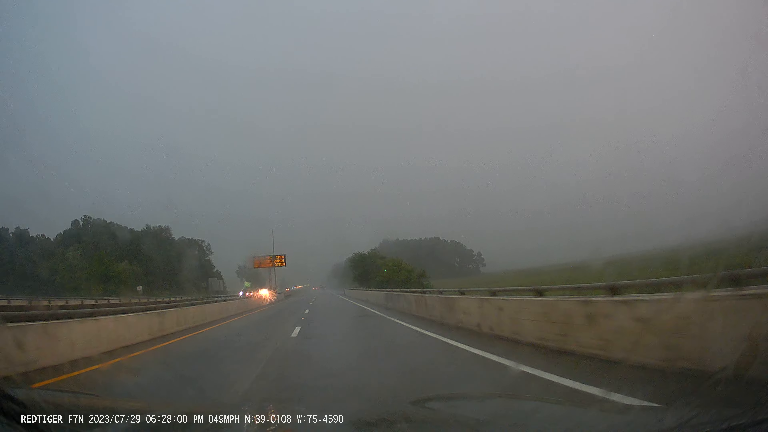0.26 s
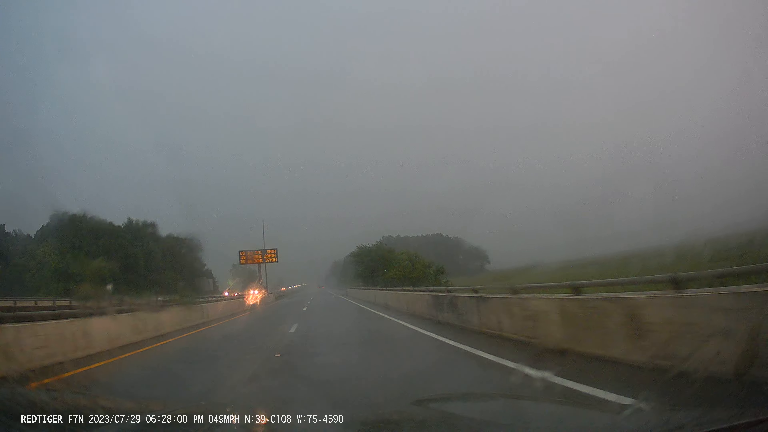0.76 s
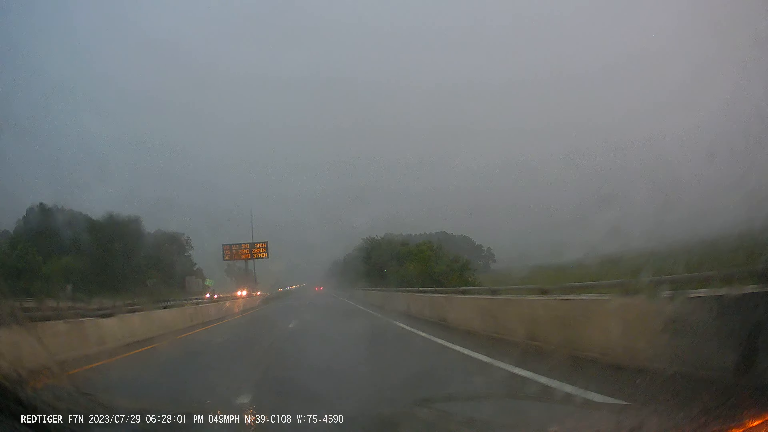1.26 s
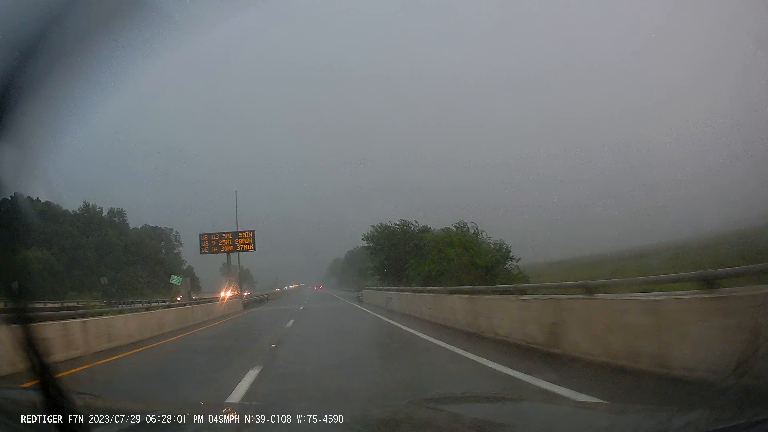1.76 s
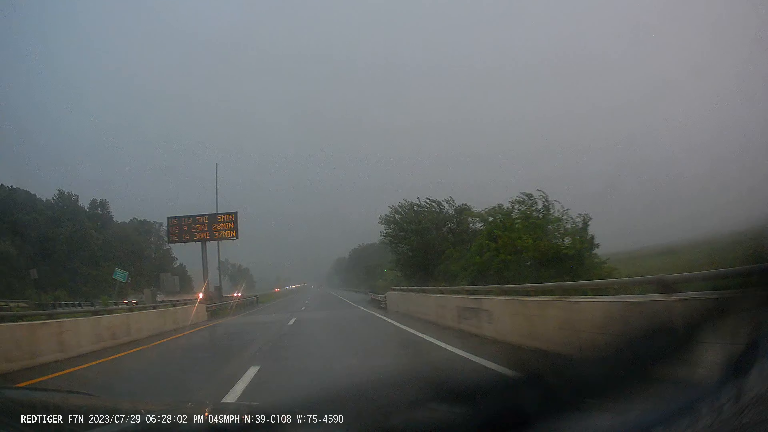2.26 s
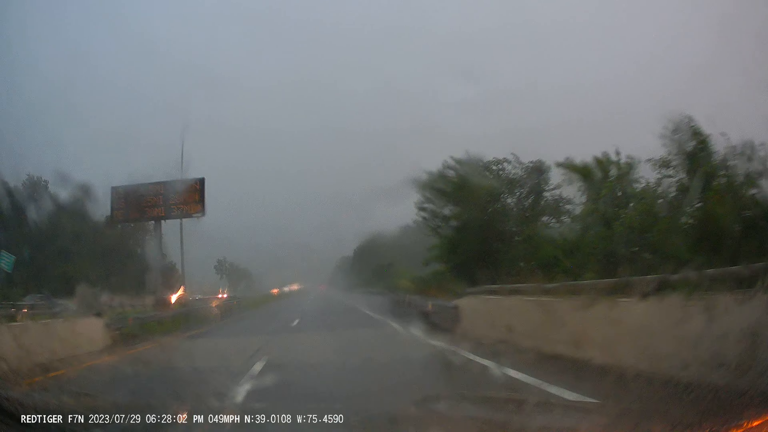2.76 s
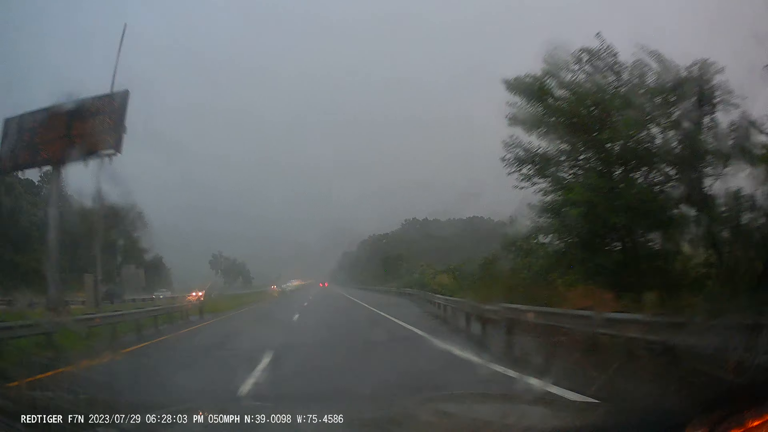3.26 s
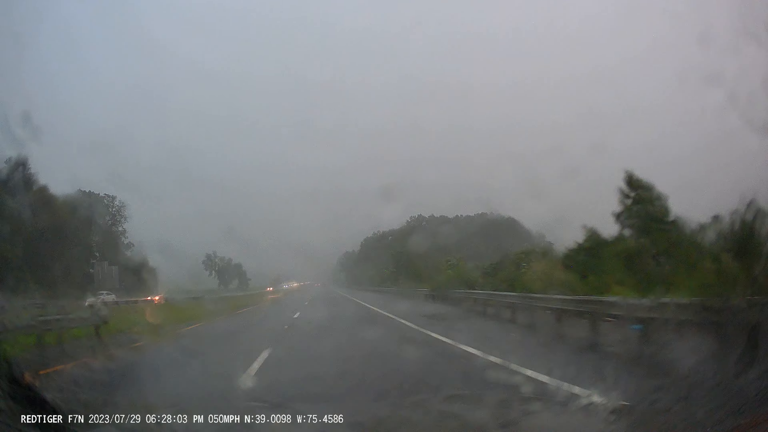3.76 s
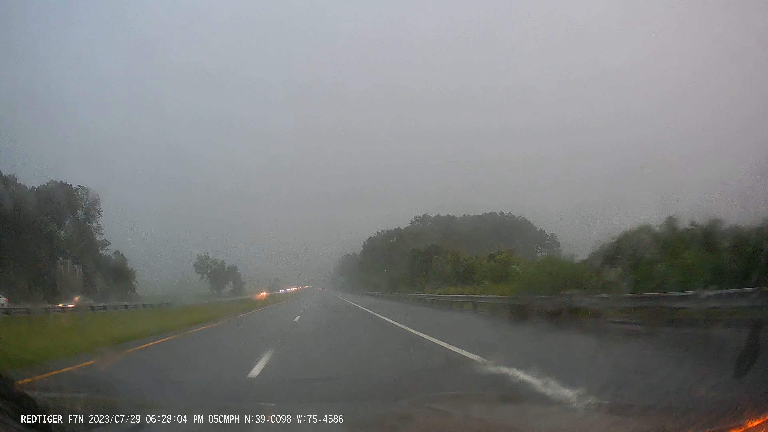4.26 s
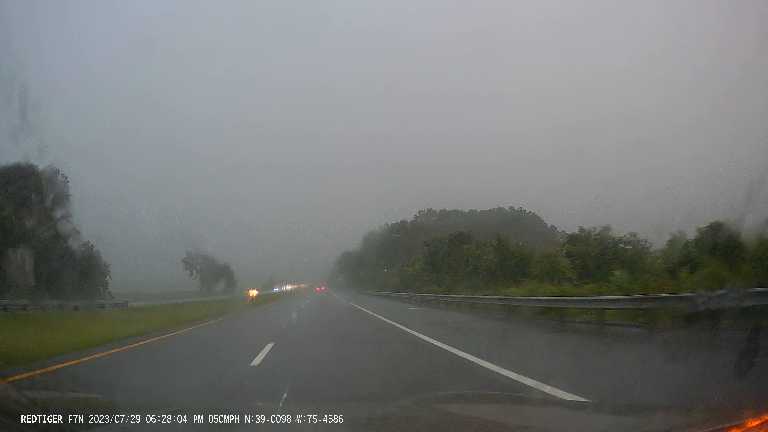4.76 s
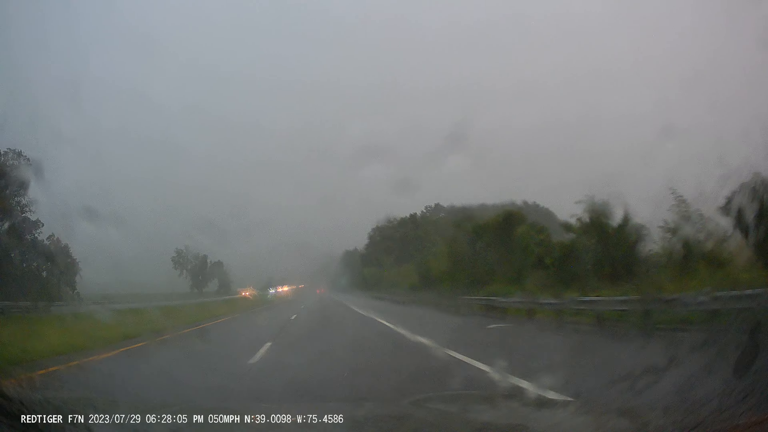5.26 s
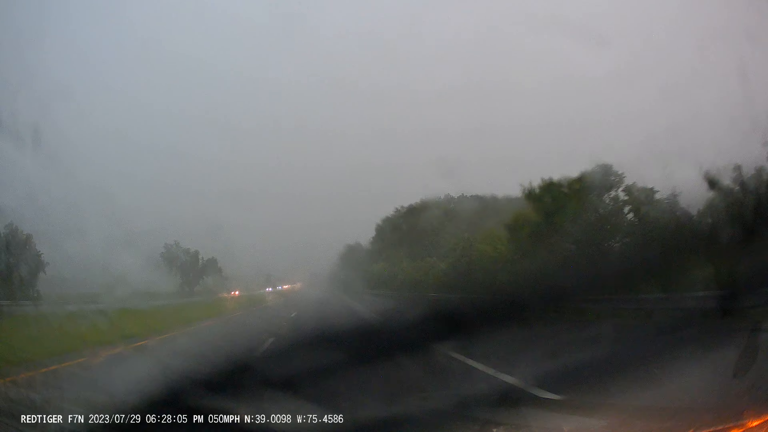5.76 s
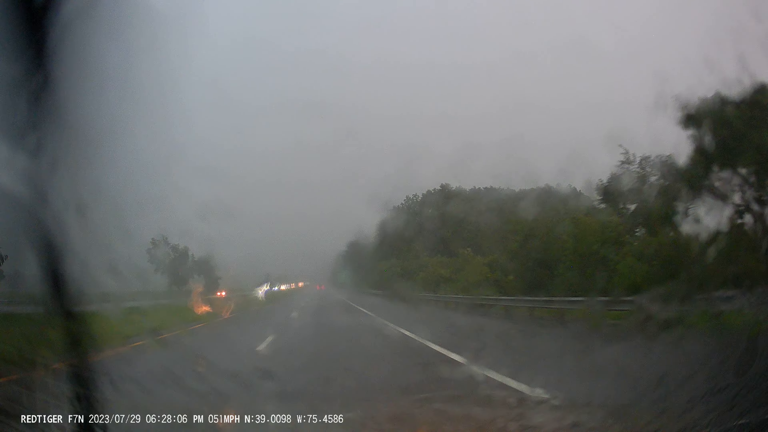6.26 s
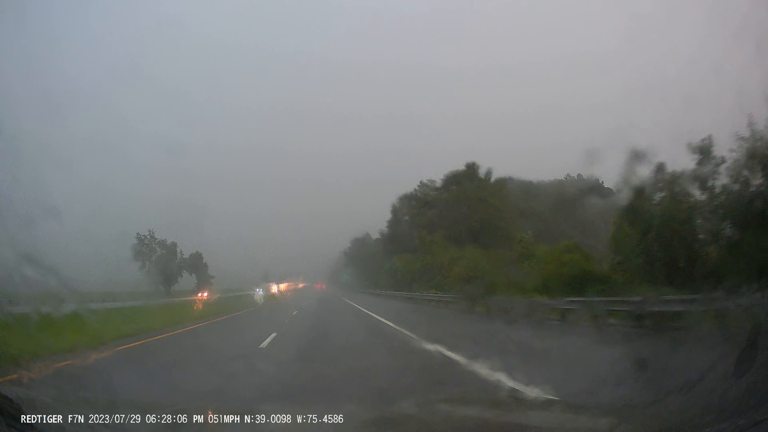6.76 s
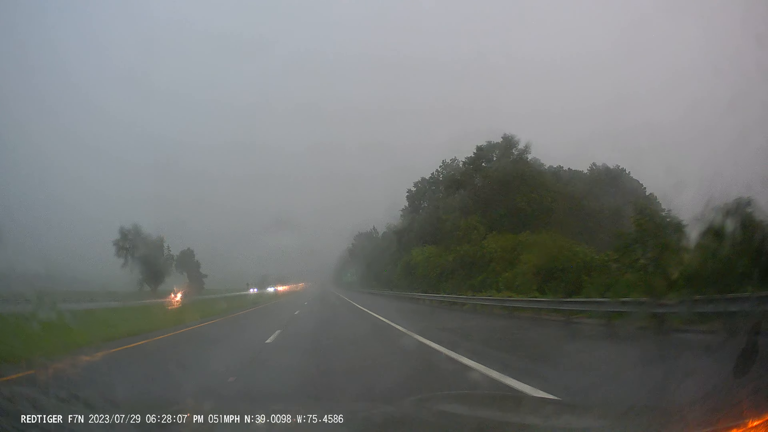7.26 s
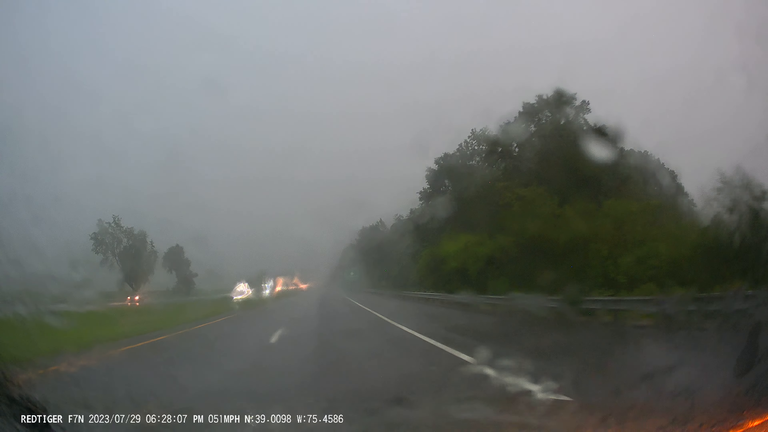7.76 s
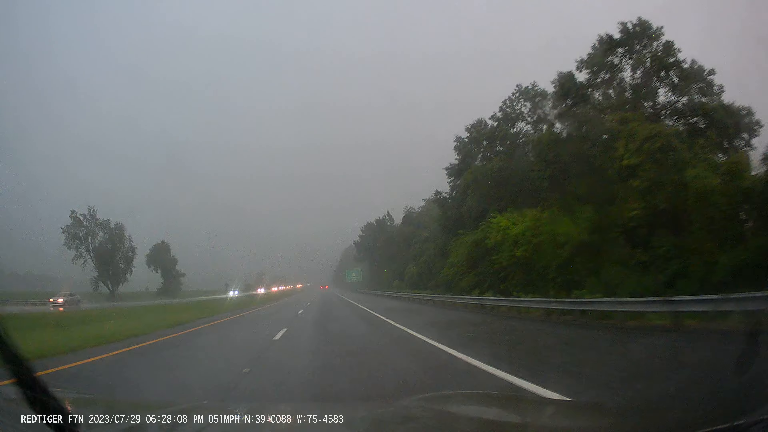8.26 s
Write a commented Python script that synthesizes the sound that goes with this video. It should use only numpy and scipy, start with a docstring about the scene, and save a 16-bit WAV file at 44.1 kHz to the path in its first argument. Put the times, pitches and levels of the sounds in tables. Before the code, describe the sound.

Inside a car on a wet highway, a small microphone at the windscreen picks up constant rain spray and rattling drops over deep cabin boom, tyre roar and wheel-well wash. Bumps swell underneath. Midway a rough stretch thuds in a cluster while the rain thins, then rain returns harder and large drops ping the glass almost to the end.

```python
"""Inside a car on a highway in heavy rain, heard by a small microphone at the windscreen.
From the start, noise rung through the glass makes spray and rattling drops, over booming cabin modes, tyre
roar and wheel-well wash; bumps swell the road and jolts ring in the body. Two tread-hum lines grow and drift
upward. Rough road brings a crowd of jolts near 3.6 s; near 4.3 s come a low noise whoosh and brief rain dips.
Large drops then ping until shortly before the end. Soft overload flattens the tallest peaks throughout."""
import sys
import numpy as np
from scipy import signal
from scipy.fft import rfft, irfft, next_fast_len
from scipy.io import wavfile
from scipy.ndimage import uniform_filter1d

SR = 44100
rng = np.random.default_rng(int(sys.argv[2]) if len(sys.argv) > 2 else 0)


def unload_wav(signal):
    """Save mono or channel-first audio to the path in sys.argv[1] as 16-bit WAV at rate SR, clipped to [-1, 1]."""
    wavfile.write(
        sys.argv[1],
        SR,
        np.round(np.clip(np.atleast_2d(signal).T, -1, 1) * 32767).astype(np.int16),
    )


N = 375286

# Rain on the glass, with its rises and dips: (time [s], level [dB])
RAIN_LEVEL = [(0, -24.5), (.3, -29.5), (.5, -25), (.57, -29.5), (.75, -24.5), (1.07, -28.5), (1.3, -23),
              (1.45, -30), (1.55, -25.5), (3.12, -24), (3.47, -22), (3.54, -32.5), (3.63, -34),
              (3.75, -31.5), (3.99, -31), (4.03, -25.5), (4.28, -21.5), (4.4, -24), (4.55, -20.5),
              (5.25, -22.5), (5.7, -20), (6.95, -18.5), (7.3, -19), (7.9, -19), (8.29, -22.5), (8.4, -19),
              (8.51, -21)]
# Further brief dips of the rain, on top of that level: (start [s], end [s], level change [dB])
RAIN_DIPS = [(4.306, 4.376, -5), (4.412, 4.464, -11), (4.478, 4.531, -10)]
# Largest single drops: (time [s], level before decay [dB], ring [Hz])
LARGE_DROPS = [(4.4666, -16, 1420), (4.9828, -0.5, 2600), (5.3078, -6, 2640), (5.5264, -4, 2640),
               (5.6276, -4, 1540), (5.71, -1, 1460), (5.959, 0, 2480), (6.0307, 1, 1500), (6.134, -2, 2740),
               (6.3135, -10, 1660), (6.393, -2, 1600), (6.456, -2, 1580), (6.759, 0.5, 2550),
               (6.909, -8, 1550), (6.94, 6, 2600), (6.9704, 3, 1420), (7.009, 3, 1700), (7.071, -1, 1730),
               (8.0531, -4, 1450), (8.2955, -11, 1840)]
# Tone of windscreen and dashboard: (frequency [Hz], gain [dB])
GLASS_TONE = [(200, -26), (500, -11.5), (950, -11.5), (2000, -13.5), (3100, -16), (4200, -17.5),
              (5600, -23.5), (7500, -29), (8300, -39), (9200, -65.5)]
# Broad glass peaks on top of that tone: (centre [Hz], width [Hz], boost [dB])
GLASS_PEAKS = [(1500, 840, 7.5), (2600, 446, 9.5), (4990, 640, 5.5)]
# Tone of water thrown into the wheel wells: (frequency [Hz], gain [dB])
WHEEL_WELL_TONE = [(150, -16.5), (260, -1.5), (400, 0.5), (600, -2.5), (850, -5.5), (1200, -17),
                   (2000, -50)]
# Road between bumps: (time [s], deep cabin boom [dB], upper cabin boom [dB], tyre roar [dB])
ROAD_LEVELS = [(0.0, -24, -21.5, -20), (1.5, -21, -23.5, -23.5), (3.1, -31, -24, -22.5),
               (3.66, -27, -21.5, -28), (4.0, -22.5, -24.5, -23), (4.5, -31, -25, -23.5),
               (7.0, -23.5, -25.5, -22), (8.51, -28.5, -28.5, -23.5)]
# Bumps: (centre [s], length [s], deep boom rise [dB], upper boom rise [dB], tyre roar rise [dB])
ROAD_BUMPS = [(0.06, 0.16, 1, 8, 2.5), (0.31, 0.082, -5, 7, 6.5), (0.453, 0.13, -5, 8, 1.5),
              (0.837, 0.094, -1, 6.5, 2), (1.214, .1, 1, 9, 9.5), (1.334, 0.15, 6, 13.5, 2.5),
              (1.718, 0.1, 2, 9, -7), (2.1, .2, -1, 4, 2.5), (2.352, .1, 5, 4, 2.5),
              (2.6, 0.13, 10, 8, -1.5), (2.92, 0.15, 8, 4.5, -2), (3.29, 0.28, 3, 7.5, 5.5),
              (3.445, 0.16, 6, 0, 6.5), (3.552, 0.47, 20, 6.5, 7), (3.883, 0.27, 9, 3, 5),
              (4.353, 0.17, 3, 5, 4.5), (4.796, 0.19, 11, 1.5, 4), (5.475, 0.11, 10, 11.5, -5),
              (5.704, 0.15, 11, -3, 0), (6.554, 0.1, 0, 11, 2), (7.05, 0.13, 5, -6, -0.5),
              (7.296, .18, 7, 5, 2.5), (7.722, .14, 2, 8.5, 2)]
# Small unevenness: rms spread of deep boom, upper boom and roar [dB]; smoothing time [s]
LUMPS_DB, LUMP_S = (1.5, 2.5, 2), 0.065
# Deep modes of cabin air and body: (centre [Hz], first-pass width [Hz], level [dB])
DEEP_BOOM_MODES = [(27, 14, -3.5), (37.05, 5, -0.5)]
# Upper cabin modes: (centre [Hz], first-pass width [Hz], level [dB])
UPPER_BOOM_MODES = [(53.2, 8.1, -1), (67.5, 21.7, -6.5)]
# Tone of the tyre roar: (frequency [Hz], gain [dB])
TYRE_TONE = [(60, -9), (80, -3), (93, 3), (110, -1.5), (200, -1.5), (260, -8.5), (320, -13.5), (500, -26.5),
             (1000, -60)]
# Jolts through the suspension: (time [s], level before decay [dB], ring [Hz])
SUSPENSION_JOLTS = [(0.281, -9.5, 187), (1.2, -12, 154), (3.123, -7.5, 231), (3.549, -7, 180),
                    (3.631, -14, 177), (3.686, -12, 200), (3.72, -10.5, 179), (3.88, -6.5, 150.6),
                    (4.334, -10, 221), (4.348, -13.5, 255), (4.383, -10, 253)]
# Tread hum: (time [s], lower line [Hz], lower level [dB], upper level [dB])
TREAD_HUM = [(0, 241.5, -39.5, -59), (2, 242.6, -31, -46.5), (3.4, 251.3, -34, -45), (3.65, 252, -50, -50),
             (4.1, 251.3, -33, -43), (6, 251, -31.5, -30), (8.51, 255.8, -30.5, -34.5)]
# Resonance widths of the hum: (lower line [Hz], upper line [Hz])
TREAD_WIDTHS = (8.0, 6.0)
# Low whoosh under the floor: (start [s], end [s], level [dB], centre [Hz], width of each pass [Hz])
FLOOR_WHOOSH = (4.31, 4.435, -23, 333, 340)
EDGE_HZ = 8750  # upper band limit


def gain_of(db):
    """Decibels to amplitude."""
    return 10 ** (np.asarray(db) / 20)


def evened(x):
    """Scales to rms 1."""
    return x / np.sqrt(np.mean(x ** 2) + 1e-20)


def curve(rows):
    """Draws every column of a table over time, one value a sample."""
    s, *columns = np.transpose(rows)
    return [np.interp(np.arange(N) / SR, s, column) for column in columns]


def read(points, hz):
    """Reads a tone table on a log-frequency axis."""
    f, value = np.transpose(points)
    return np.interp(np.log(hz + 1), np.log(f + 1), value)


def add(mix, s, sound):
    """Mixes a sound in at time s."""
    part = mix[round(s * SR):][:len(sound)]
    part += sound[:len(part)]


def shaped(points):
    """Steady noise with the given tone."""
    spectrum = rfft(rng.standard_normal(N))
    tone_db = read(points, np.fft.rfftfreq(N, 1 / SR))
    return evened(irfft(spectrum * gain_of(tone_db), N))


def resonate(x, hz, width):
    """Shifts hz down to zero, smooths, and shifts back: a resonance of gain 1."""
    turn = np.exp(2j * np.pi * np.cumsum(hz * np.ones(len(x))) / SR)
    r = np.exp(-np.pi * width / SR)
    smooth = signal.lfilter([1 - r], [1, -r], x / turn)
    return 2 * (turn * smooth).real


def wander(seconds):
    """Smoothed chance of rms 1 that changes over about the given time."""
    size = max(int(seconds * SR), 1)
    once = uniform_filter1d(rng.standard_normal(N), size=size)
    return evened(uniform_filter1d(once, size=size))


def ring(db, hz, t60, rise_s):
    """One damped vibration with a short soft start; t60 is its 60 dB decay time."""
    t = np.arange(SR // 8) / SR
    envelope = gain_of(db - 60 * t / t60) * np.minimum(t / rise_s, 1)
    return envelope * np.sin(2 * np.pi * hz * t)


def spray(patchy_db=1.0, treble_db=1.15):
    """Countless fine drops: white noise with drifting patches; the finest mist comes in puffs."""
    a, b, patches = rng.standard_normal((N // 128 + 5, 257, 3)).T
    patches = uniform_filter1d(patches, size=10, axis=0)  # across frequency
    patches = evened(uniform_filter1d(patches, size=14, axis=1))  # across time
    puffs = evened(uniform_filter1d(rng.standard_normal(a.shape[1]), size=4))
    # the puffs fade in from 2500 to 6500 Hz
    high = np.clip((np.fft.rfftfreq(512, 1 / SR) - 2500) / 4000, 0, 1)[:, None]
    z = (a + 1j * b) * gain_of(patchy_db * patches + treble_db * high * puffs)
    return evened(signal.istft(z, nperseg=512, noverlap=384)[1][:N])


def taps(per_s, spread_db, cycles, low_hz=1500.0, high_hz=8450.0, count=16):
    """Separate drops, each a few cycles at one of several pitches; a few are large."""
    chance, size, kind = rng.random((N, 3)).T
    size_db = spread_db * np.minimum(-np.log(size + 1e-9), 4.5)
    train = (chance < per_s / SR) * gain_of(size_db)
    pitch_index = (kind * count).astype(int)
    out = np.zeros(N)
    for k, hz in enumerate(np.geomspace(low_hz, high_hz, count)):
        grain = ring(0, hz, cycles / hz, .5 / hz)[:1024]
        grain = grain / np.linalg.norm(grain)  # equal energy at every pitch
        out += signal.oaconvolve(train * (pitch_index == k), grain)[:N]
    return evened(out)


def glass_response():
    """Causal response of the windscreen and dashboard to one tap."""
    hz = abs(np.fft.fftfreq(8192, 1 / SR))
    db = read(GLASS_TONE, hz)
    for centre, width, boost_db in GLASS_PEAKS:
        db = db + boost_db / (1 + (2 * (hz - centre) / width) ** 2)
    log_gain = np.log(gain_of(db))
    # minimum phase puts the energy as early as the tone allows
    return np.fft.ifft(np.exp(np.conj(signal.hilbert(log_gain)))).real[:2048]


def rain(taps_db=-8.5, ripple_db=.9, flicker_db=.9):
    """Spray and separate drops excite the glass; water in the wheel wells follows the rain in part."""
    level_db, = curve(RAIN_LEVEL)
    wells_db = -28.5 + 0.57 * (level_db - level_db.mean())
    wells = shaped(WHEEL_WELL_TONE) * gain_of(wells_db)
    t = np.arange(N) / SR
    for start, end, change_db in RAIN_DIPS:
        inside = np.clip(np.minimum(t - start, end - t) / .005 + .5, 0, 1)  # 5 ms edges
        level_db = level_db + change_db * inside
    drive = spray() + gain_of(taps_db) * taps(per_s=1600., spread_db=3.0, cycles=4.0)
    drive = drive * gain_of(ripple_db * wander(.02) + flicker_db * wander(.005))
    glass = evened(signal.oaconvolve(drive, glass_response())[:N]) * gain_of(level_db)
    for s, db, hz in LARGE_DROPS:
        add(glass, s, ring(db, hz, t60=0.0072, rise_s=0.0012))
    return glass + wells


def road_levels():
    """Slow levels, bent by a rounded swell at every bump and stirred by small unevenness."""
    t, levels_db = np.arange(N) / SR, np.array(curve(ROAD_LEVELS))
    for s, length, *rise_db in ROAD_BUMPS:
        swell = np.cos(np.pi * np.clip((t - s) / length, -.5, .5))
        levels_db = levels_db + np.outer(rise_db, swell)
    return levels_db + [spread_db * wander(LUMP_S) for spread_db in LUMPS_DB]


def boom(modes, steadiness=.75):
    """Noise in low modes; the swing keeps a fairly even size while its pitch wavers."""
    x = np.zeros(N)
    for hz, width, db in modes:
        first = resonate(rng.standard_normal(N), hz, width)
        x += gain_of(db) * evened(resonate(first, hz, 2 * width))
    x = evened(x)
    swing = abs(signal.hilbert(x, next_fast_len(N))[:N])
    return evened(x / (swing + 0.17) ** steadiness)


def road():
    """Roughness shakes the cabin's low modes and roars through the tyres; jolts ring with an overtone."""
    deep_db, upper_db, roar_db = road_levels()
    out = gain_of(deep_db) * boom(DEEP_BOOM_MODES)
    out += gain_of(upper_db) * boom(UPPER_BOOM_MODES)
    out += gain_of(roar_db) * shaped(TYRE_TONE)
    for s, db, hz in SUSPENSION_JOLTS:
        body = ring(db, hz, t60=0.094, rise_s=0.0038)
        overtone = ring(db - 13.0, 1.9 * hz, t60=0.088, rise_s=0.0059)
        add(out, s, body + overtone)
    return out


def hum():
    """Tread blocks slap the road: two wavering lines of narrow noise, the upper at 4/3 of the lower."""
    hz, low_db, high_db = curve(TREAD_HUM)
    low_width, high_width = TREAD_WIDTHS
    low = evened(resonate(rng.standard_normal(N), hz, low_width))
    high = evened(resonate(rng.standard_normal(N), 4 / 3 * hz, high_width))
    return gain_of(low_db) * low + gain_of(high_db) * high


def whoosh():
    """A short burst of low resonant noise that swells and dies."""
    start, end, db, hz, width = FLOOR_WHOOSH
    size = round((end - start) * SR)
    noise = rng.standard_normal(SR // 4)[:size]
    burst = evened(resonate(resonate(noise, hz, width), hz, width))
    out = np.zeros(N)
    add(out, start, gain_of(db) * burst * signal.windows.tukey(size, .6))
    return out


def scene():
    """Everything heard in the cabin, as one channel."""
    return (rain() + road() + hum() + whoosh())[None]


def record(dry, ceiling=.67, knee=5.5):
    """Soft microphone overload flattens the tallest peaks; then the band limit cuts the top."""
    clipped = dry / (1 + abs(dry / ceiling) ** knee) ** (1 / knee)
    low_pass = signal.firwin(255, EDGE_HZ, window=("kaiser", 9), fs=SR)
    return signal.oaconvolve(clipped, low_pass[None], "same")


dry = scene()
out = record(dry)
unload_wav(out)
```